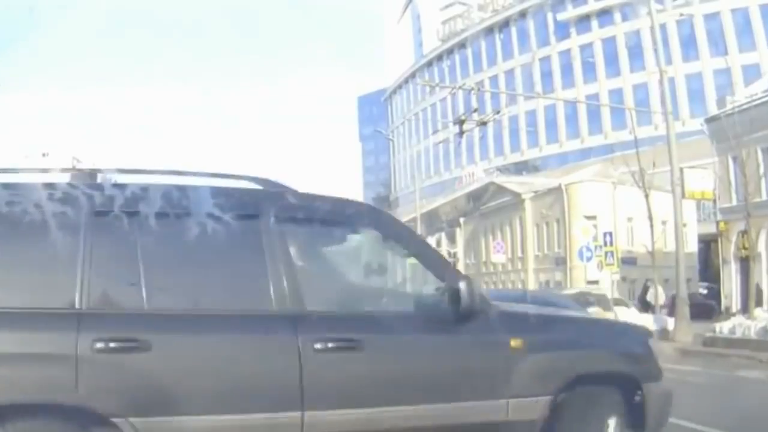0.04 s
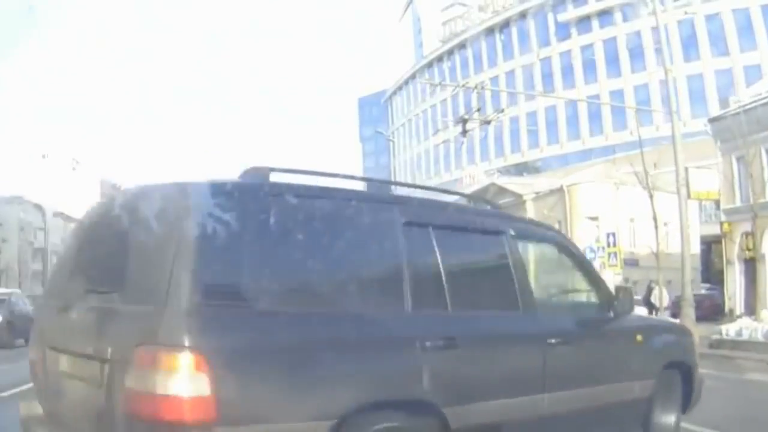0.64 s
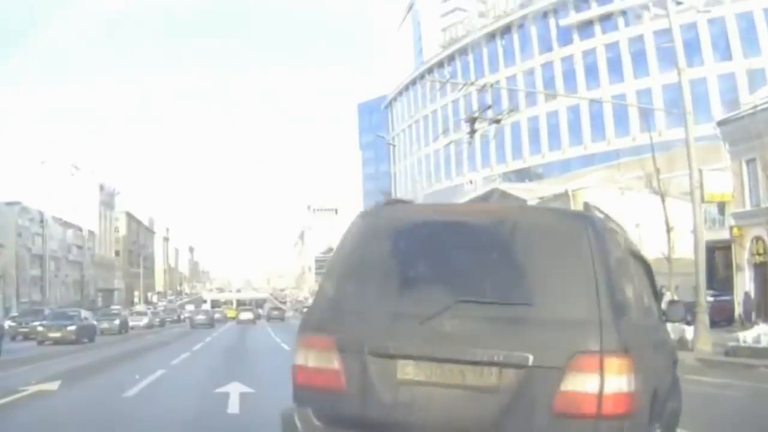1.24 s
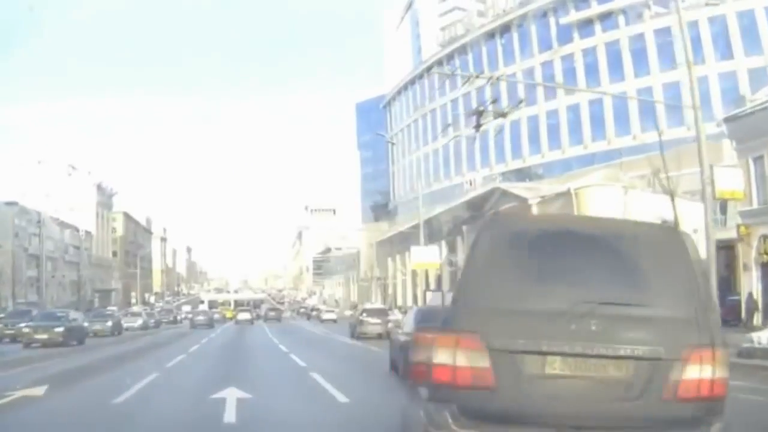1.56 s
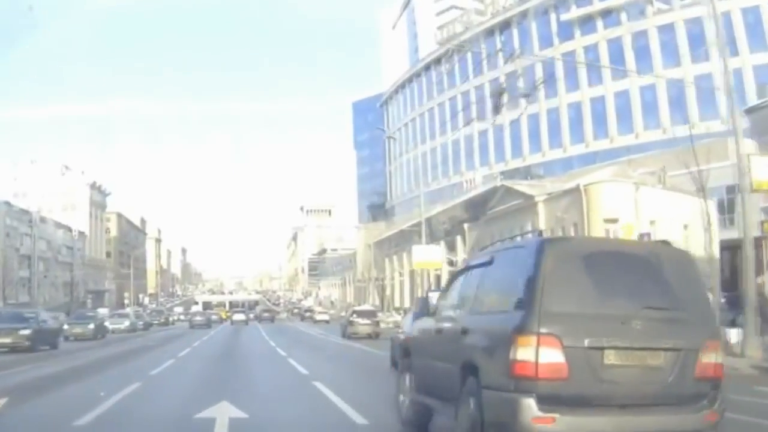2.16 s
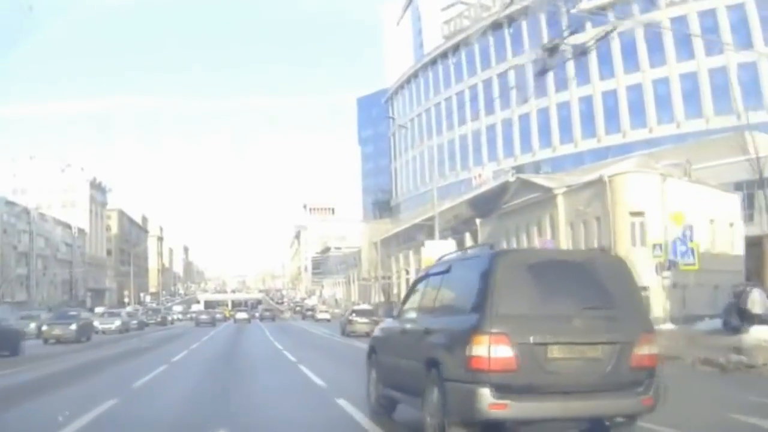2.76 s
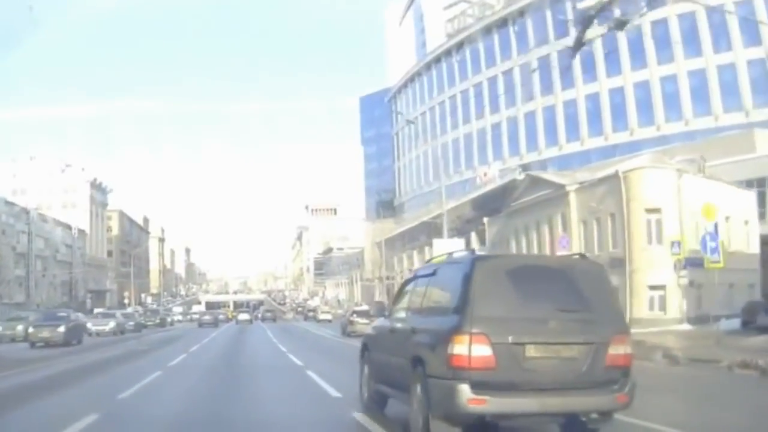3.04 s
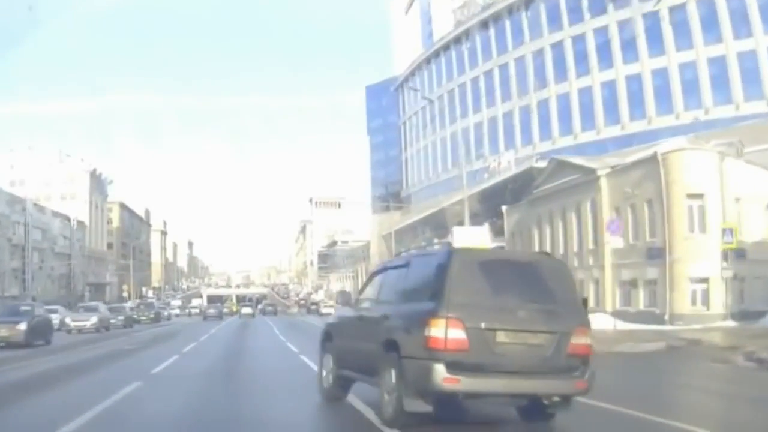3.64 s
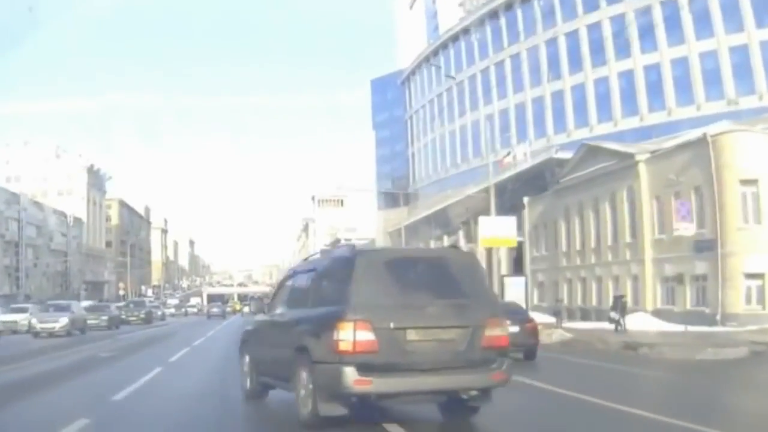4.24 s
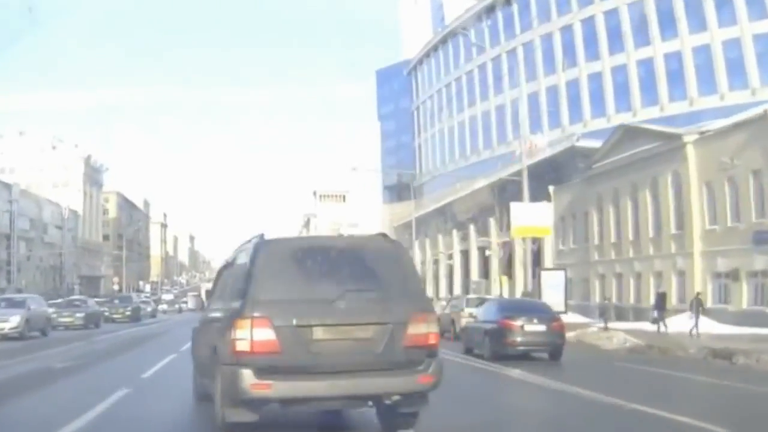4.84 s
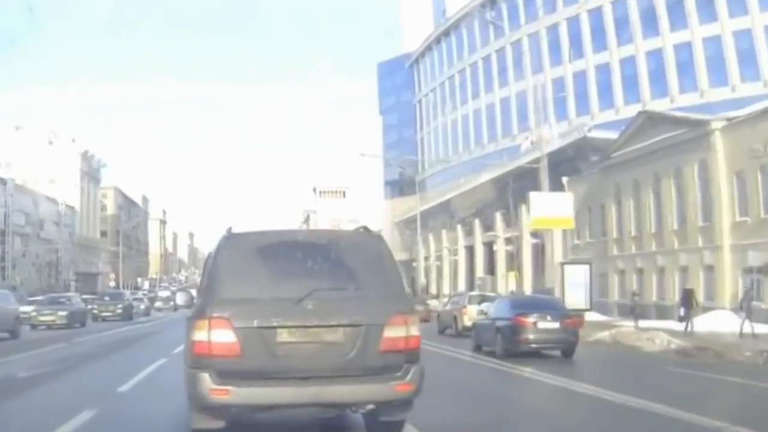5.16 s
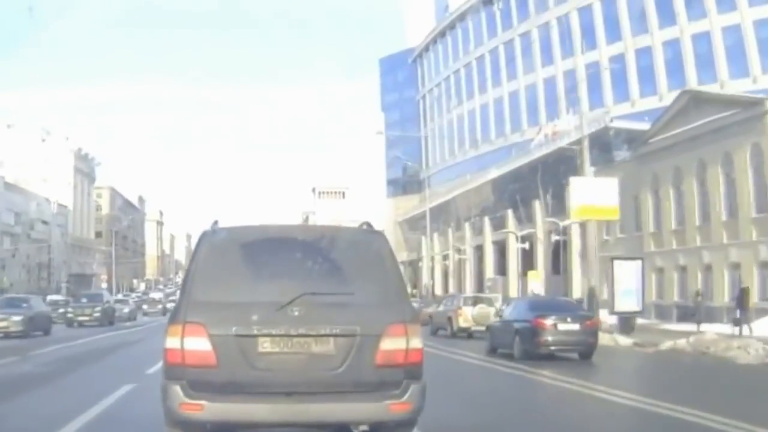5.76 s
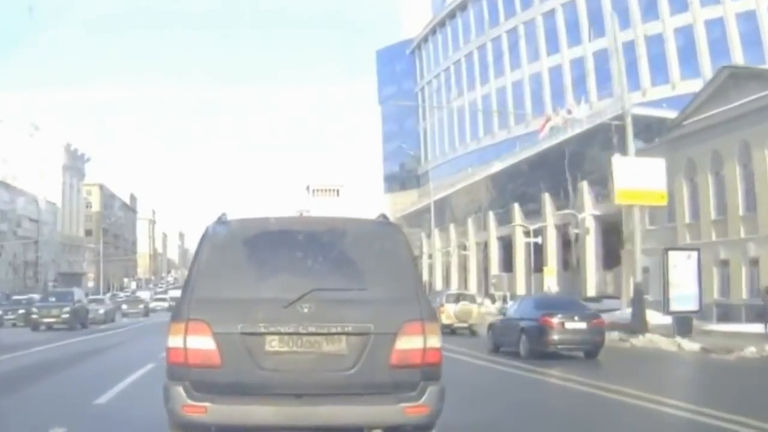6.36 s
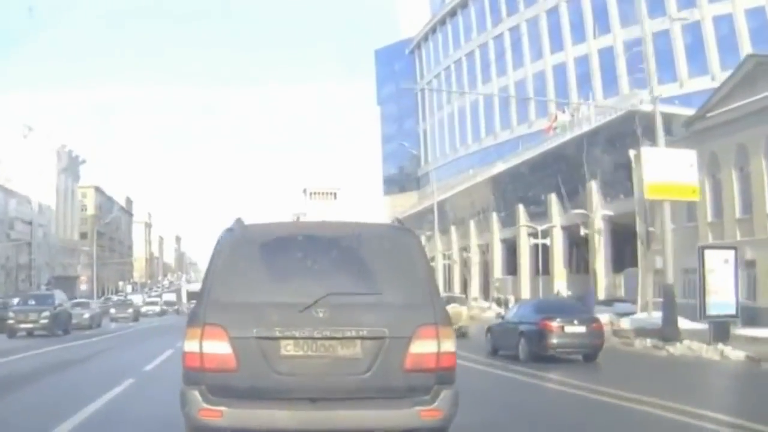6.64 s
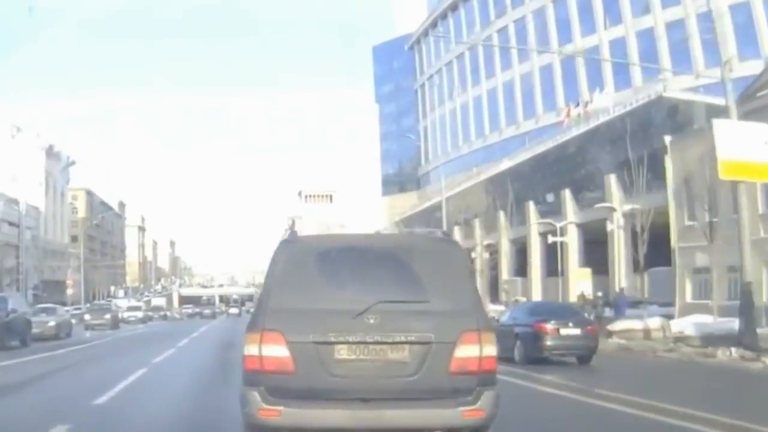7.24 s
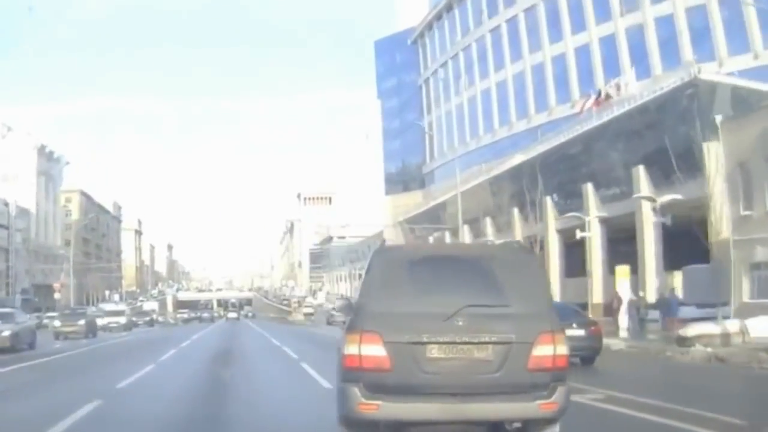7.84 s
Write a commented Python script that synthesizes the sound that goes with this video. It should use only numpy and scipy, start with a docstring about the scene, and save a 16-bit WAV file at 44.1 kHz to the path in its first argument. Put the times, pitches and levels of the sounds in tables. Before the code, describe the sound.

Inside a car driving along a city street, two long horn blasts dominate, each made of two clashing notes with a close plastic buzz on top. In the pause after the first, the engine climbs in pitch and eases off, tyres hum on the road and the interior trim ticks faintly. The second blast is held to the end as the car pulls on.

```python
"""A two-note car horn blares, heard from a camera inside a car in city traffic; later it blares again.
Its two notes beat against each other, and every swell sets the camera's housing buzzing.
Between the blasts the engine revs up and drops back over the rush of the tyres,
and the cabin's trim gives a few dry ticks."""
import sys
import numpy as np
from scipy.fft import rfft, irfft, next_fast_len
from scipy.io import wavfile
from scipy.ndimage import uniform_filter1d, map_coordinates

SR = 44100
rng = np.random.default_rng(int(sys.argv[2]) if len(sys.argv) > 2 else 0)


def dump_mix(stems):
    """Bounce the given channels to the path in sys.argv[1] as a 16-bit WAV at rate SR."""
    frames = np.atleast_2d(stems).T  # one column per channel
    limited = np.clip(frames, -1, 1)  # hard clip at full scale
    pcm = np.round(limited * 32767).astype(np.int16)
    wavfile.write(sys.argv[1], SR, pcm)


N = 347928

# the low note starts uneven, with extra tones between its overtones, then steadies
UNEVEN_DB, STEADY_DB, STEADIES_S, STEADYING_S = -20, -30, .7, 0.11
# the housing works loose once: when, how quickly, and its looseness before that (0-1)
LOOSENS_S, LOOSENING_S, TIGHT = 0.49, 0.05, 0.094
# overtones of the low note (first blast, second blast) and the high note: multiple of the note, level/dB
LOW_MELLOW = [(1, 0), (2, -16), (3, -26), (4, -24.5), (5, -27), (6, -18)]
LOW_BRIGHT = [(1, -0.5), (2, -14.5), (3, -19), (4, -42), (5, -21.5), (6, -23)]
HIGH_OVERTONES = [(1, 0.5), (2, 2.5), (3, -9.5), (4, -19.5), (5, -32)]
# moments when the buzz gets louder: t/s, length/s, added level/dB
BUZZ_FLARES = [(1.69, 0.05, 2.5), (6.95, 0.18, 1)]
# horn blasts: press t/s, release t/s, low f/Hz, high f/Hz, low level/dB, high level/dB,
# starting buzz level/dB, buzz growth/(dB/s), housing looseness (0-1)
BLASTS = [(-.2, 1.762, 419.7, 496.2, -22, -21.5, -28.5, -0.97, .19),
          (5.355, 8.2, 420.1, 495.8, -21, -22, -32.5, .55, .42)]
def horn(mixing=0.9, low_cut_hz=400, high_cut_hz=1150):
    """Two trumpets, loud enough to shake the housing; sum and difference tones of their notes sound with them."""
    t = clock()
    uneven = amp(UNEVEN_DB + (STEADY_DB - UNEVEN_DB) * step(STEADIES_S, STEADYING_S))
    lows, highs, shake, buzz_db, loose = np.zeros((5, N))
    for blast, low_overtones in zip(BLASTS, (LOW_MELLOW, LOW_BRIGHT)):
        press, release, low_hz, high_hz, low_db, high_db, start_db, growth, looseness = blast
        low, low_swing = trumpet(press, release, low_hz, low_overtones, uneven)
        high, high_swing = trumpet(press, release, high_hz, HIGH_OVERTONES)
        lows += np.sqrt(2) * amp(low_db) * low
        highs += np.sqrt(2) * amp(high_db) * high
        shake += low_swing + high_swing
        buzz_db = np.where(t >= press, start_db + growth * (t - press), buzz_db)
        loose = np.where(t >= press, looseness, loose)
    loose = TIGHT + (loose - TIGHT) * step(LOOSENS_S, LOOSENING_S)
    midrange = lambda hz: 1 / (1 + (low_cut_hz / (hz + 1)) ** 4) / (1 + (hz / high_cut_hz) ** 4)
    mixed_tones = filtered(2 * lows * highs, midrange)
    return lows + highs + mixing * mixed_tones + buzz(shake, buzz_db + swells(BUZZ_FLARES), loose)


def trumpet(press, release, note_hz, overtones, uneven=0,
            rise_s=0.017, fade_s=0.14, sag=.035, settle_s=0.02154, waver=.0005):
    """A thin disc swings in a pipe, a little flat as it starts and stops. Gives its sound and swing."""
    held, after = np.maximum(clock() - press, 0), np.maximum(clock() - release, 0)
    swing = (1 - np.exp(-(held / rise_s) ** 2)) * amp(-60 * after / fade_s)
    flat = sag * (np.exp(-held / settle_s) + 1 - np.exp(-after / settle_s))
    phase = turning(note_hz * (1 - flat + waver * wobble(25) + .0005 * wobble(160)))
    # the coiled pipe delays each overtone differently
    sound = sum(amp(db) * swing ** np.sqrt(k) * np.sin(k * phase + np.pi / 2 * (k - 1) ** 2)
                for k, db in overtones)
    # an uneven swing adds tones halfway between the overtones
    between = uneven * swing * (np.sin(1.5 * phase) + np.sin(2.5 * phase))
    return sound + between, swing * np.sin(phase) + 0.41 * between


# pitches the housing rings at: f/Hz, width/Hz, boost when tight/dB, boost when loose/dB
HOUSING_RINGS = [(1977, 91, 19, 6), (3206, 120, 13.5, 10), (4155, 270, 11, 4), (4582, 213, 7, 13),
                 (11660, 730, 2, 5.5)]
def buzz(shake, level_db, loose, gap=.9, slop_s=0.00023, creep=.04, scatter=0.5):
    """The housing taps once a cycle, but only while the two notes swell together past its gap."""
    contact = shake - gap * np.exp(creep * loose * wobble(14))  # one note alone swings about 1
    hits = np.flatnonzero((contact[:-1] < 0) & (contact[1:] >= 0))
    speed = contact[hits + 1] - contact[hits]
    # the looser the housing, the more the taps vary in timing and force
    chance = rng.standard_normal((len(hits), 2))
    when = hits - contact[hits] / speed + slop_s * SR * loose[hits] * chance[:, 0]
    force = unit(speed ** 2) * np.exp(scatter * loose[hits] * chance[:, 1])
    # a tap falls between samples, so it is drawn as a tiny pulse over 16 of them
    near = np.floor(when).astype(int)[:, None] + np.arange(-7, 9)
    offset = near - when[:, None]
    pulse = force[:, None] * np.sinc(offset) * np.cos(np.pi * offset / 16) ** 2
    taps = np.bincount(np.clip(near, 0, N - 1).ravel(), pulse.ravel(), N)
    # the faces also scrape while they touch
    taps += loose ** 2 * np.maximum(contact, 0) * rng.standard_normal(N)
    # other rings take over as the housing works loose
    tight = housing(taps, [(hz, width, db) for hz, width, db, _ in HOUSING_RINGS])
    slack = housing(taps, [(hz, width, db) for hz, width, _, db in HOUSING_RINGS])
    slack_share = np.clip((loose - TIGHT) / 0.15, 0, 1)
    return amp(level_db) * unit(housing_echoes(tight + slack_share * (slack - tight)))


# the housing's overall tone: f/Hz, level/dB
HOUSING_TONE = [(80, -62.5), (450, 0), (900, 5), (1130, -0.5), (1600, -6), (2000, -5.5), (2600, 1),
                (3100, -3.5), (3650, -10.5), (5000, -15.5), (6300, -24.5), (7500, -14), (10200, -31.5),
                (12000, -29), (15500, -40.5)]
def housing(taps, rings):
    """The housing gives the taps its own tone, boosted at the pitches where it rings."""
    boost = lambda hz: sum(db / (1 + (2 * (hz - centre) / width) ** 2) for centre, width, db in rings)
    return unit(filtered(taps, lambda hz: amp(along(HOUSING_TONE, hz) + boost(hz))))


# round trips of a tap inside the housing: t/s
ROUND_TRIPS = [.00029, .00047, .00079, .00117]
def housing_echoes(taps, echo=0.64, lag_s=.005):
    """Echoes in the housing smear each tap over a few milliseconds without changing its tone."""
    size = next_fast_len(N + SR // 2)
    delay = lambda s: np.exp(-2j * np.pi * np.fft.rfftfreq(size, 1 / SR) * s)
    smear = np.prod([(delay(s) - echo) / (1 - echo * delay(s)) for s in ROUND_TRIPS], axis=0)
    return irfft(rfft(taps, size) * smear * delay(lag_s), size)[:N]


# the roar with the pedal up at the reference firing rate, and its gain each time that rate doubles
COAST_DB, REFERENCE_HZ, DB_PER_OCTAVE = -57, 106.4, 5.5
# how often the engine fires: t/s, f/Hz
FIRING_RATE = [(0, 53.3), (.5, 55.9), (.85, 63.1), (1.3, 63.4), (1.96, 74.66), (2.45, 85.15), (2.94, 98.74),
               (3.45, 111.6), (3.87, 93.2), (4.1, 75.2), (6, 72.8), (7.89, 79.4)]
# engine tones: multiple of the firing rate, level/dB compared with the roar (before any boom)
ENGINE_TONES = [(1, -20), (2, -19), (3, -22), (3.5, -27), (4, -11.5), (5, -12.5), (6, -11), (7, -29)]
# pitches at which the cabin and air intake boom: f/Hz, half width/Hz, boost/dB
BOOMS = [(98.7, 15.6, 13), (132, 6.9, 15), (208.4, 13.4, 11.5), (412, 26, 8.5)]
# tone of the air rushing into the engine: f/Hz, level/dB
ROAR_TONE = [(120, -35), (200, -14), (330, -9.5), (410, -0.5), (470, -6), (620, -1), (950, -7.5),
             (1310, -10.5), (1560, -18), (3050, -23), (3750, -33), (9000, -55)]
def engine(inertia_s=0.17, throb=0.15, rough_db=0.26, rough_phase=0.08, surge_db=-0.4):
    """Firing tones and an intake roar that pulses with them; both grow with speed and throttle."""
    # the engine's inertia rounds off changes of speed
    firing_hz = uniform_filter1d(np.interp(clock(), *np.transpose(FIRING_RATE)), int(inertia_s * SR))
    speed_db = DB_PER_OCTAVE * np.log2(firing_hz / REFERENCE_HZ)
    roar_db = COAST_DB + speed_db + throttle() + surge_db * wobble(6.5)
    phase = turning(firing_hz * (1 + 0.0027 * wobble(20)))
    tones = np.zeros(N)
    for k, db in ENGINE_TONES:
        boom_db = sum(boost / (1 + ((k * firing_hz - hz) / width) ** 2) for hz, width, boost in BOOMS)
        # no two firings are alike, which roughens the higher tones most
        level = amp(roar_db + db + boom_db + rough_db * k * wobble(30))
        tones += level * np.sin(k * phase + rough_phase * k * wobble(30))
    roar = amp(roar_db) * unit(noise(ROAR_TONE) * (1 + throb * np.sin(phase)))
    return np.sqrt(2) * tones + roar


# pushes on the pedal: down t/s, up t/s, added level/dB
PEDAL_PUSHES = [(.6, 3.805, 14), (2.72, 3.75, 6), (6.7, 8.2, 15.5)]
def throttle(push_s=0.098, lift_s=.19):
    """Extra dB from the pedal: each push rises, holds and falls away; overlapping pushes add up."""
    t = clock()
    return sum(db * (1 - np.exp(-np.maximum(t - down, 0) / push_s))
               * np.exp(-np.maximum(t - up, 0) / lift_s) for down, up, db in PEDAL_PUSHES)


# the car pulls away: when, time to gather speed, and its speed before as a share of cruising
PULL_AWAY_S, GATHER_S, CRAWL = 0.37, 1.0, 0.58
RUSH_DB, RUMBLE_DB, DRONE_DB = -45, -57.5, -53.5  # at cruising speed
# tone of the tyres' rush: f/Hz, level/dB
TYRE_TONE = [(30, -31), (70, -13), (134, -11.5), (200, -11), (400, -8.5), (600, -11.5), (950, -8),
             (1470, -17), (2000, -18.5), (3000, -20), (4200, -25.5), (6400, -28.5), (11000, -37),
             (15500, -46)]
# bumps in the road: t/s, length/s, level/dB
BUMPS = [(0.674, 0.12, -53.5), (6.8, 0.062, -52)]
def road(drone_power=5, rumble_power=3.9, thump_share=.4):
    """The tyres rush and drone and the body rumbles, all louder as the car speeds up; bumps thump."""
    speed = 1 - (1 - CRAWL) * np.exp(-np.maximum(clock() - PULL_AWAY_S, 0) / GATHER_S)
    jolt = swells([(s, length, amp(db)) for s, length, db in BUMPS])
    rush = speed * amp(RUSH_DB + 0.23 * wobble(7)) * noise(TYRE_TONE)
    rumble = (speed ** rumble_power * amp(RUMBLE_DB) + thump_share * jolt) * band(43, q=0.72)
    drone = (speed ** drone_power * amp(DRONE_DB) + jolt) * band(132.4, q=3.8)
    return rush + rumble + drone


# ticks of the trim: t/s, level/dB, rise/s, time to fade 60 dB/s, f/Hz, thud level/dB against the tick
TRIM_TICKS = [(1.955, -49.5, 0.025, 0.24, 2400, -20), (2.407, -47, 0.0036, 0.062, 3600, -16),
              (4.502, -43.5, 0.0018, 0.049, 3900, -19), (5.258, -37, 0.01, 0.061, 2550, 2)]
def trim(thud_hz=550):
    """The cabin's trim gives short dry ticks and scuffs, each with a dull thud of the panel."""
    out = np.zeros(N)
    for s, db, rise_s, fade_s, centre_hz, thud_db in TRIM_TICKS:
        t = clock() - s
        shape = np.exp(np.minimum(t, 0) / rise_s) * amp(-60 * np.maximum(t, 0) / fade_s)
        tick = band(centre_hz, q=.7)
        thud = amp(thud_db) * band(thud_hz, q=0.66)
        out += amp(db) * shape * (tick + thud)
    return out


def amp(db):
    """Turn decibels into a multiplier."""
    return 10 ** (np.asarray(db) / 20)


def unit(x):
    """Scale to an average (rms) level of 1."""
    return x / np.sqrt(np.mean(x ** 2) + 1e-20)


def clock():
    """Time of each sample in seconds."""
    return np.arange(N) / SR


def step(s, width):
    """A smooth change from 0 to 1 around a moment."""
    return .5 + .5 * np.tanh((clock() - s) / width)


def swells(rows):
    """Brief bell-shaped swells added up, each (t/s, length/s, height)."""
    return sum(height * np.exp(-((clock() - s) / length) ** 2) for s, length, height in rows)


def wobble(rate):
    """A smooth random curve through rate points a second."""
    return map_coordinates(rng.standard_normal(int(N * rate / SR) + 4), [np.arange(N) * rate / SR])


def turning(hz):
    """Phase of a changing frequency."""
    return 2 * np.pi * np.cumsum(hz) / SR


def along(points, hz):
    """Read between (f/Hz, value) points on a pitch scale."""
    f, v = np.transpose(points)
    return np.interp(np.log(hz + 1), np.log(f + 1), v)


def filtered(x, gain):
    """Scale each frequency of x by gain(hz), ringing only after a sound, never before it."""
    size = 2 * next_fast_len(N // 2 + SR // 4)
    cepstrum = irfft(np.log(np.maximum(gain(np.fft.rfftfreq(size, 1 / SR)), 1e-6)))
    cepstrum[1:size // 2] *= 2
    cepstrum[size // 2 + 1:] = 0
    return irfft(rfft(x, size) * np.exp(rfft(cepstrum)), size)[:N]


def noise(tone):
    """Noise of level 1, shaped by (f/Hz, level/dB) points."""
    return unit(filtered(rng.standard_normal(N), lambda hz: amp(along(tone, hz))))


def band(centre_hz, q):
    """Noise of level 1 around one pitch; a higher q makes it narrower."""
    gain = lambda hz: 1 / (1 + (q * ((hz + 1) / centre_hz - centre_hz / (hz + 1))) ** 2)
    return unit(filtered(rng.standard_normal(N), gain))


def scene():
    """All the sounds meet at one microphone."""
    return (horn() + engine() + road() + trim())[None]


def record(dry, top_hz=15750):
    """The camera cuts off the very highest treble."""
    size = next_fast_len(N + SR // 2)
    return irfft(rfft(dry, size) * (np.fft.rfftfreq(size, 1 / SR) < top_hz), size)[..., :N]


dry = scene()
out = record(dry)
dump_mix(out)
```